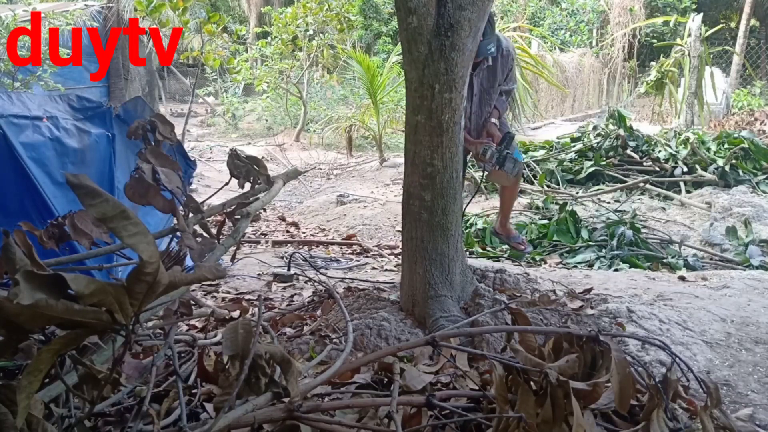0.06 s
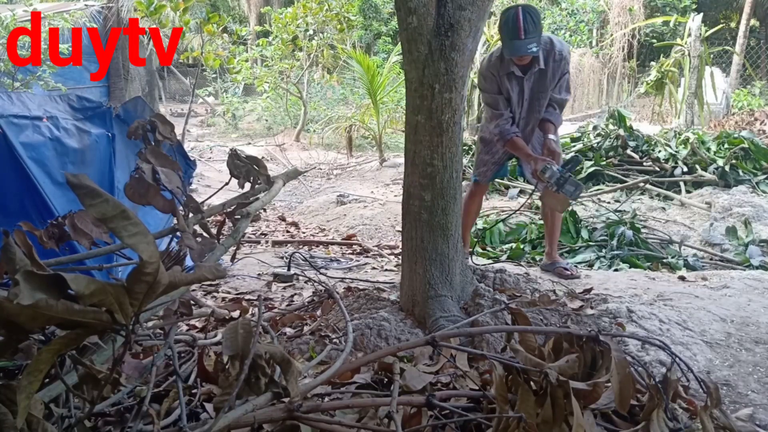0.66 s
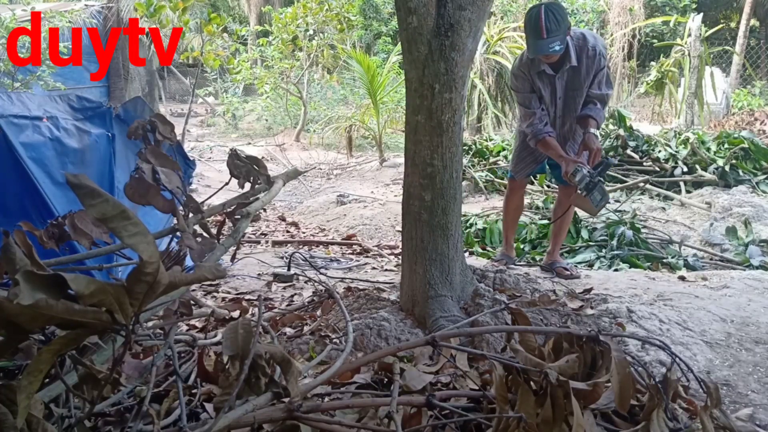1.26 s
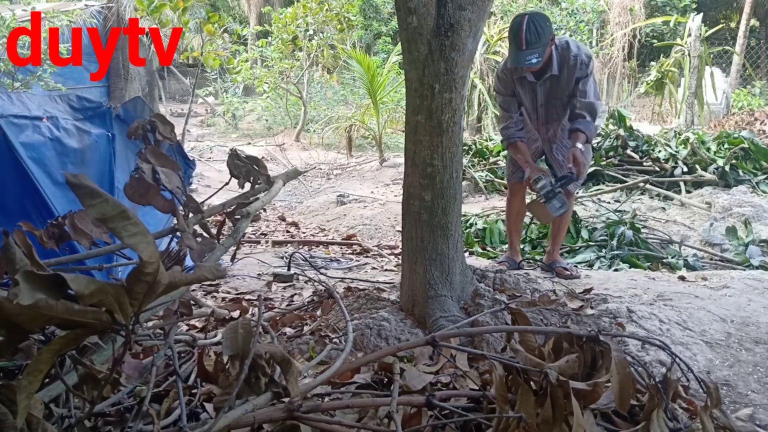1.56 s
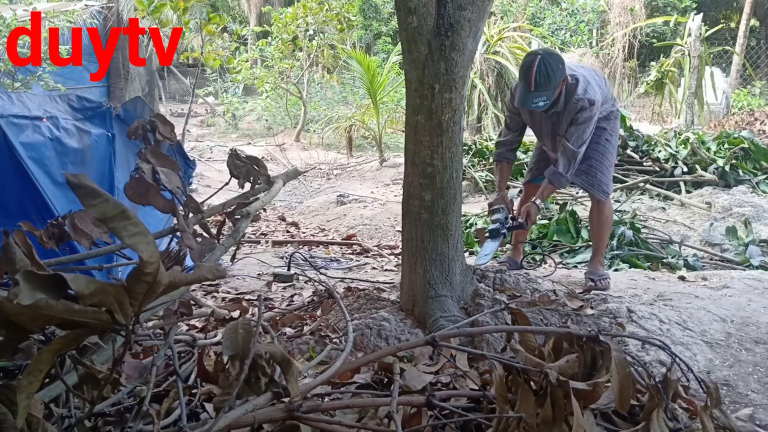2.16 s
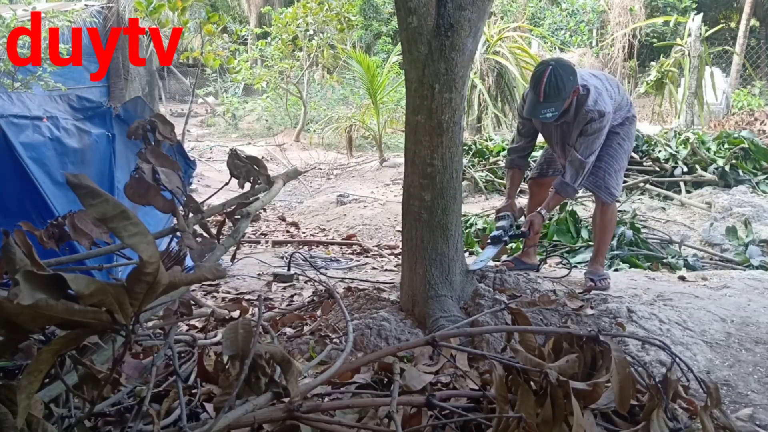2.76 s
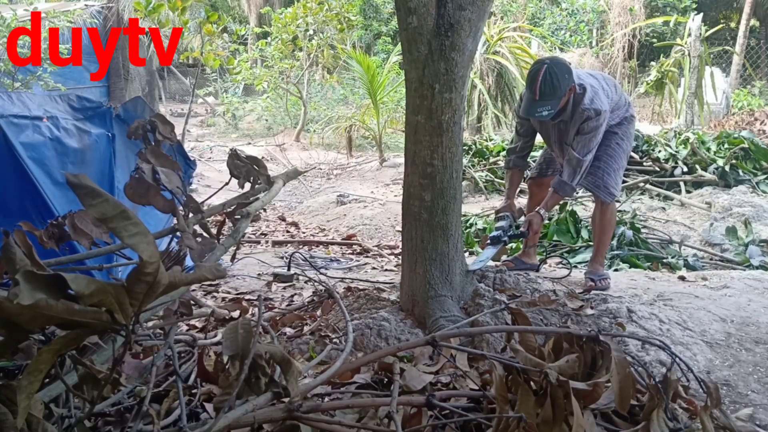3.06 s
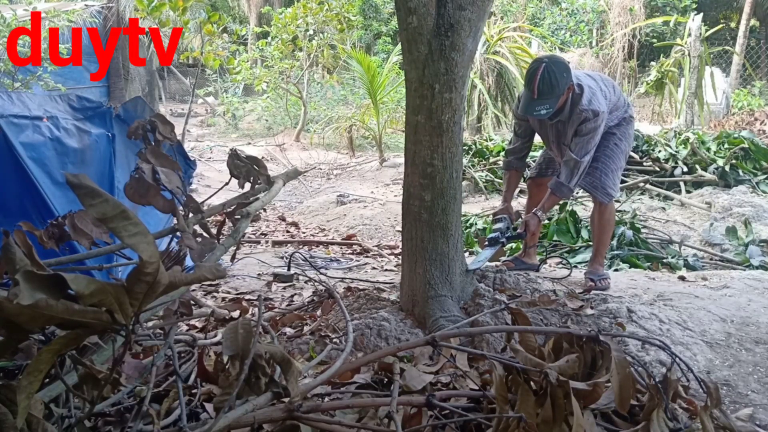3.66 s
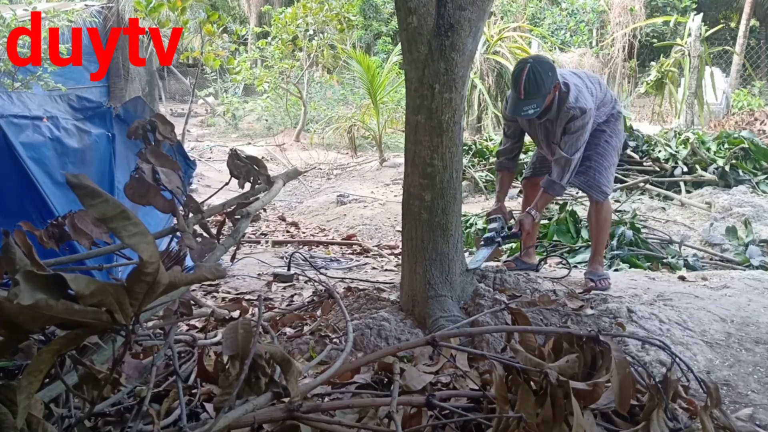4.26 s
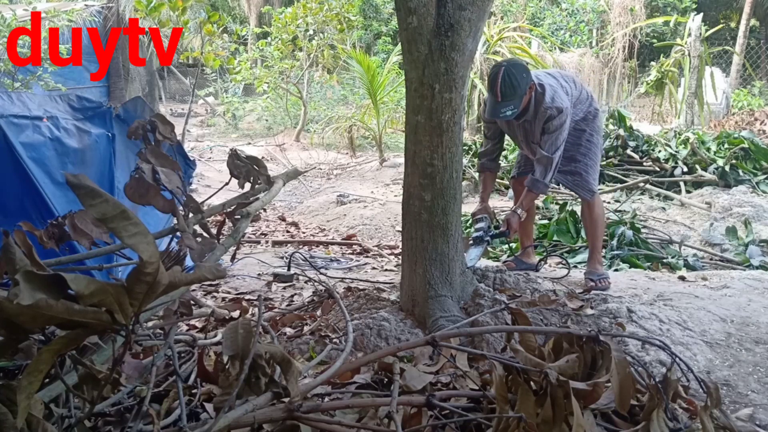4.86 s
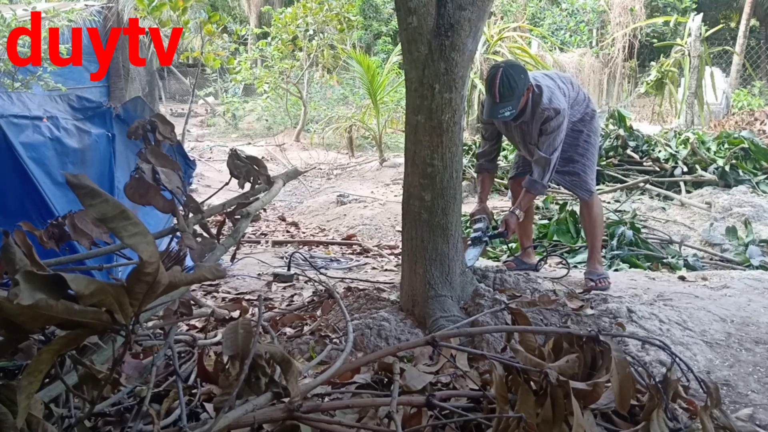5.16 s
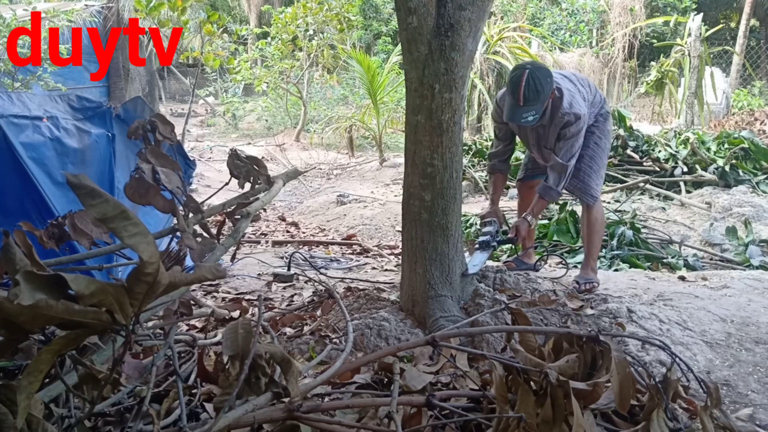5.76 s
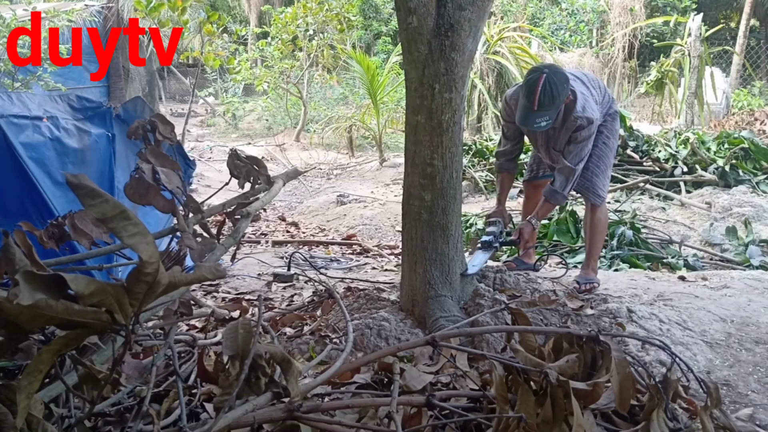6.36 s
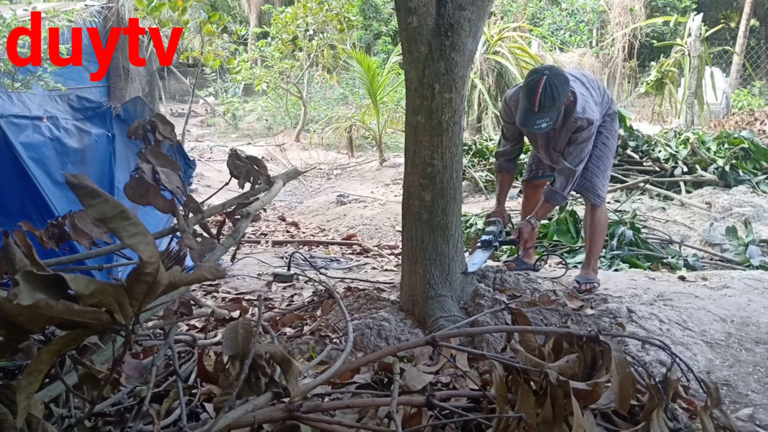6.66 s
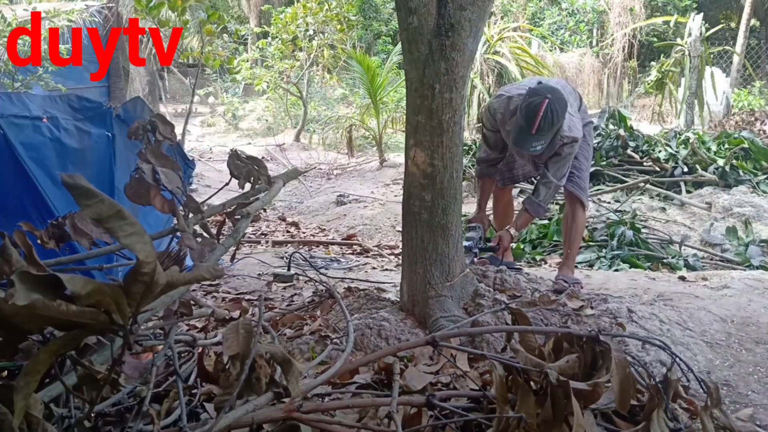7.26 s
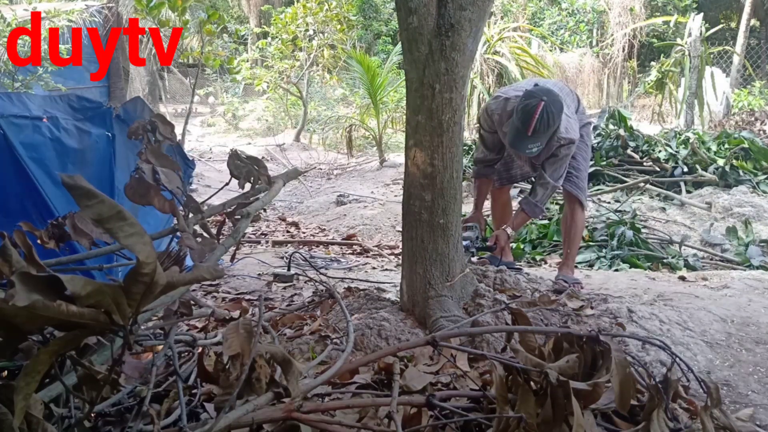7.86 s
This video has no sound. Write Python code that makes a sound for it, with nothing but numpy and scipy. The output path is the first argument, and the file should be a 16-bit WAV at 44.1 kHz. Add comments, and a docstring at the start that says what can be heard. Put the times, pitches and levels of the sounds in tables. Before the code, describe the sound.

A light chain clink breaks a quiet outdoor background, then an electric grinder with a chain bar snaps on and rises to a high, hissing whine. The rattling chain starts tearing into a tree trunk, and the motor's pitch drops under the load. After a coarse growl in the deepest part of the cut, the motor picks up again, then suddenly changes to a lower, lighter run.

```python
"""Outdoors, over faint leaves and far rumble, a loose chain clinks on the bar fitted to an angle grinder.
The electric motor is switched on and whines up, its fan hisses and the chain clatters round the bar.
Lowered into the foot of a tree trunk, the cutters rasp and knock, and the motor sags under the load.
The bar digs in with a growl, then the motor recovers.
Near the end the sound cuts abruptly to a slower, lighter run."""
import sys
import numpy as np
from scipy import signal
from scipy.fft import rfft, irfft, next_fast_len
from scipy.io import wavfile
from scipy.ndimage import map_coordinates

SR = 44100
rng = np.random.default_rng(int(sys.argv[2]) if len(sys.argv) > 2 else 0)


def transcribe(u):
    """Save the signal u as a 16-bit wav file named by the first command-line argument.

    u: samples, shape (n,) or (channels, n), limited to [-1, 1]; the rate is SR.
    q: integer samples, one column per channel.
    """
    v = np.clip(np.atleast_2d(u).T, -1, 1)
    q = np.round(v * 32767).astype(np.int16)
    wavfile.write(sys.argv[1], SR, q)


N = 357651
TIME = np.arange(N) / SR
FFT_SIZE = next_fast_len(N + SR // 2)
BINS_HZ = np.maximum(np.arange(FFT_SIZE // 2 + 1) * SR / FFT_SIZE, 1)
SWITCH_ON_S, JUMP_AT_S = .868, 7.445   # the motor starts; the sound jumps to a slower, lighter run


def running():
    """The motor runs up and the wood slows it. Gives the state: speed, sag, bite, after_jump."""
    # the wood dragging on the chain: time_s, share_of_speed_lost
    drag = [(2.82,0),(3.51,.067),(3.83,.091),(4.47,.166),(4.79,.214),(4.97,.228),(5.11,.224),(5.27,.208),(5.62,.203),(6.23,.225),(6.57,.244),(6.71,.213),(7.03,.139),(7.19,.122),(7.42,.107),(7.95,.147),(8.11,.136)]
    # how hard the cutters bite: time_s, bite (0 free to 1 hardest)
    biting = [(2.3,0.028),(3.3,0.18),(3.7,0.38),(4.5,0.55),(5.15,0.24),(5.6,0.41),(6.35,0.95),(6.9,0.45),(7.4,0.45)]
    top_speed_hz, half_speed_s = 454.5, .109
    age = np.maximum(TIME - SWITCH_ON_S, 1 / SR)
    free_speed = top_speed_hz / (1 + (half_speed_s / age) ** .825)
    sag = in_time(drag)
    after_jump = np.clip((TIME - JUMP_AT_S) / .2 + .5, 0, 1)
    return free_speed * (1 - sag), sag, in_time(biting), after_jump


def chain(turns, state):
    """Links hit sprocket and bar and set the housing and steel ringing; now and then one slaps harder."""
    # ringing notes of the guard and gear housing: pitch_hz, width_hz, level_db
    housing_modes = [(1948,180,-10.5),(2396,270,-3.5),(2602,260,-1),(2855,254,-2),(3440,590,-11.5),(3654,85,-7.5)]
    # the chain swishing round the bar: pitch_hz, level_db
    swish_spectrum = [(1500,-65),(3400,-15),(3900,-5.5),(4400,0),(5300,4),(6000,-5),(7000,-10),(8500,-38)]
    # the bar's bright ring: pitch_hz, level_db
    ring_spectrum = [(2500,-65),(4500,-19),(4720,-4),(4950,2),(5300,-3.5),(5800,-5.5),(6350,-10),(6850,-12.5),(8300,-34)]
    # that ring grows as the tip meets the wood: time_s, level_db
    ring_levels = [(1.4,-39),(2.1,-32.5),(2.85,-26),(3.5,-24),(5.1,-24.5),(6.3,-23.5),(7.4,-26),(7.53,-27)]
    # links grinding on the walls of the cut: pitch_hz, level_db
    grind_spectrum = [(1800,-60),(2900,-12),(3300,4),(4200,4),(4700,-6),(7000,-35)]
    # the free chain clattering while the tool is held high: pitch_hz, level_db
    clatter_spectrum = [(400,-31),(520,-3.5),(620,-1),(740,-2),(860,-23),(1100,1),(1400,8),(1800,-15),(2300,15),(2650,13.5),(3300,-5),(4500,-38)]
    ripple_hz, lowered_s, lowering_s = 100.4, 2.26, .52
    links = contacts(turns * 1.09, uneven_db=4, scrape_s=.00034, sliding_db=9.5)
    slaps = contacts(turns * .27, uneven_db=3.5, scrape_s=.0016, sliding_db=9)
    surge = 1 + .085 * np.sin(2 * np.pi * ripple_hz * TIME)   # the motor pulses at twice the mains rate
    force = surge * links * slaps
    housing = resonate(noise(force), housing_modes)
    housing *= loudness(state, db=-25, speed_db=1, sag_db=5.5, after_jump_db=-1.5)
    swish = loudness(state, db=-27.5, speed_db=3.5, after_jump_db=-3)
    swish *= coloured(noise(force), swish_spectrum)
    ring = from_db(in_time(ring_levels)) * coloured(noise(force), ring_spectrum)
    grind = loudness(state, db=-43.5, sag_db=55, after_jump_db=-1)
    grind *= coloured(noise(force), grind_spectrum)
    held_high = np.clip((lowered_s - TIME) / lowering_s, 0, 1)
    clatter = from_db(-28.5) * held_high * coloured(noise(force), clatter_spectrum)
    return housing + swish + ring + grind + clatter


def whine(turns, state):
    """The motor hums at low multiples of its speed; the gear sings as twelve teeth meet each turn."""
    # the main hum: times_per_turn, level_db
    hum_tones = [(2,0.5)]
    # tones around the octave above it: times_per_turn, level_db
    octave_tones = [(3,-16),(4,0),(6,-8.5),(8,-10)]
    # the gear's tones: times_per_turn, level_db
    gear_tones = [(6.55,-16),(10,-10.5),(12,0),(12.3,-10),(14,-7.5)]
    # the hum swells and fades as the tool is moved: time_s, level_db
    hum_levels = [(1.05,-39),(1.33,-43),(1.55,-39),(1.8,-43),(2.2,-40),(3.3,-42.5),(3.85,-48),(4.3,-45.5),(4.6,-40.5),(5.05,-40),(5.4,-36.5),(5.7,-43),(7.35,-40.5),(7.5,-49),(7.8,-41.5)]
    # so does its octave: time_s, level_db
    octave_levels = [(1.05,-38),(1.22,-42),(1.37,-32),(1.7,-42),(2.1,-36.5),(2.95,-34.5),(3.75,-43),(4,-35),(4.5,-36.5),(5,-45),(5.35,-37.5),(5.75,-42),(7.05,-34),(7.2,-45),(7.85,-38.5)]
    # how well the motor's shell gives off each pitch: pitch_hz, gain_db
    motor_shell = [(300,-19),(560,-5.5),(690,1),(755,0.5),(820,0),(1030,7),(1180,-0.5),(1400,1.5),(1750,-1.5)]
    # the same for the gear's casing: pitch_hz, gain_db
    gear_casing = [(1000,-40),(2050,-18),(2330,9),(2850,9),(3100,1),(3410,4.5),(3620,2),(3750,-7.5),(4100,-5),(4450,-3),(4750,-1.5),(4960,3),(5600,-4)]
    hum = from_db(in_time(hum_levels)) * tones(turns, hum_tones, flutter_db=1.6, flutter_hz=70)
    octave = from_db(in_time(octave_levels)) * tones(turns, octave_tones, flutter_db=2.2, flutter_hz=70)
    gear = tones(turns, gear_tones, flutter_db=1.6, flutter_hz=150)
    gear *= loudness(state, db=-31.8, speed_db=-3.5, after_jump_db=1.2)
    brief_gap = 1 - np.exp(-((TIME - JUMP_AT_S) / .02) ** 2)
    return brief_gap * (shaped(hum + octave, motor_shell) + shaped(gear, gear_casing))


def cutters(turns, state):
    """Each cutter tears off a chip with a rasp; heavier bites knock and thud in the trunk."""
    # wood tearing: pitch_hz, level_db
    rasp_spectrum = [(250,-31),(600,-17),(780,-4.5),(920,-4),(1040,-1),(1220,-2.5),(1420,1.5),(1630,4),(1800,0.5),(2100,0.5),(3700,-6),(9000,-48)]
    # the trunk's knock: pitch_hz, level_db
    knock_spectrum = [(130,-47),(270,-3),(360,0),(440,1.5),(560,3),(750,9.5),(1020,20),(1300,-3),(2000,-27)]
    # its deep thud: pitch_hz, level_db
    thud_spectrum = [(40,-23),(90,-6),(150,-7.5),(235,-1),(330,-19),(1000,-48)]
    # the trunk droning as it grips the shaking bar: times_per_turn, level_db
    trunk_tones = [(.7,-5.5),(1,-2.5)]
    tearing = noise(contacts(turns * .36, uneven_db=.5, scrape_s=.001, sliding_db=4.5))
    gripped = np.clip(state[1] / .11, 0, 1)   # full grip once the speed sags by 11 %
    drone = gripped * tones(turns, trunk_tones, flutter_db=4.5, flutter_hz=45)
    drone *= loudness(state, db=-52.5, bite_db=-2, after_jump_db=-7)
    rasp = coloured(tearing, rasp_spectrum)
    rasp *= loudness(state, db=-29.5, speed_db=.5, sag_db=-24, bite_db=4, after_jump_db=-5.5)
    knock = loudness(state, db=-50.5, bite_db=12.5, after_jump_db=5) * coloured(tearing, knock_spectrum)
    thud = loudness(state, db=-65, bite_db=13.5, after_jump_db=-1) * coloured(tearing, thud_spectrum)
    return rasp + knock + thud + drone


def growl(turns):
    """While the bar digs in deep, the chain judders through the wood in coarse jolts."""
    # the juddering chain: pitch_hz, level_db
    growl_spectrum = [(420,-31),(520,-3),(620,-23),(760,4.5),(900,1),(1120,2),(1280,-5),(1550,5),(2000,-25)]
    start_s, end_s, fade_s = 5.68, 6.72, .12
    digging = np.clip(np.minimum(TIME - start_s, end_s - TIME) / fade_s, 0, 1)
    jolts = contacts(turns * .18, uneven_db=2, scrape_s=.004, sliding_db=-3)
    return from_db(-36) * digging * coloured(noise(jolts), growl_spectrum)


def fan(turns, state):
    """The cooling fan hisses, with a fine spatter of chips in it; a roar follows speed and cut."""
    # rushing air: pitch_hz, level_db
    hiss_spectrum = [(400,-40),(2000,0),(6500,0.5),(8000,-1),(9700,-3.5),(10400,-2),(11500,0),(12500,-3),(13600,3.3),(15500,0)]
    spatter = contacts(turns * .7, uneven_db=3.5, scrape_s=.0006, sliding_db=3.5)
    hiss = coloured(noise(spatter), hiss_spectrum)
    hiss *= loudness(state, db=-27.6, speed_db=8, bite_db=3.5, after_jump_db=-4.5)
    roar = drift(130) * np.sin(2 * np.pi * 2.35 * turns)
    roar *= loudness(state, db=-45.5, sag_db=-17, bite_db=10)
    return hiss + shaped(roar, [(300, -30), (550, -4.5)])   # a small fan gives off little bass


def loose_chain():
    """The loose chain clinks on the bar; at switch-on the chain snatches up its slack in two quick jerks."""
    # the chain touches the bar: peak_s, level_db
    touch_times = [(.69,0),(.717,-2)]
    # the bar's ringing notes: pitch_hz, width_hz, level_db
    bar_modes = [(2630,130,-15),(3700,600,-14),(4690,100,-13),(4950,100,0),(5180,140,-8),(5700,700,-16)]
    # steel gives off little treble above those notes: pitch_hz, gain_db
    steel_treble = [(6200,0),(7500,-5),(10000,-20)]
    # the slack pulls tight: peak_s, level_db
    jerk_times = [(.868,0),(.897,-1)]
    touches = sum(from_db(db) * burst(s, rise_s=.015, fade_s=.26) for s, db in touch_times)
    clink = coloured(resonate(touches, bar_modes), steel_treble)
    jerks = sum(from_db(db) * burst(s, rise_s=.00038, fade_s=.06) for s, db in jerk_times)
    snatch = resonate(jerks, [(900, 1100, -9), (2570, 180, 9.5), (5200, 640, -6)])
    return from_db(-67.5) * clink + from_db(-50.5) * coloured(snatch, [(200, -25), (650, 0)])


def outdoors(x):
    """The direct sound reaches the left side first; ground, trunks and leaves add short echoes."""
    # how far the left side's wave is ahead: pitch_hz, lead_radians
    left_lead = [(50,0.5),(700,0.01),(1640,0.49),(2600,1.15),(4400,1.25),(4850,2.5),(5430,3.5),(6700,3),(9000,1.5),(12500,3),(14000,3.5)]
    # how much louder the left is than the right: pitch_hz, gain_db
    balance = [(100,-1.5),(1200,-0.9),(2700,0.5),(4800,-5.5),(5800,2.5),(9000,-1),(14000,-0.5)]
    # the echoes against the direct sound: pitch_hz, level_db
    scatter = [(100,-13),(700,-8.5),(1500,-5.5),(2900,-3),(3900,2.5),(5200,-3.5),(7200,2),(8700,-5),(14000,7)]
    echoes = np.zeros((2, N))
    shiftable = signal.hilbert(x, FFT_SIZE)[:N]   # a form of x whose pitch is easy to shift
    lags_s = np.geomspace(.003, .03, num=20)
    for k, lag in enumerate((lags_s * SR).astype(int)):
        shift_hz = 11 * rng.uniform(-1, 1)   # the moving tool shifts each echo a little
        shifted = np.real(shiftable * np.exp(2j * np.pi * (shift_hz * TIME + rng.random())))
        echoes[k % 2, lag:] += from_db(-60 * lag / SR / .35) * shifted[:-lag]
    echo_share = from_db(per_bin(scatter))
    sides = np.array([[1], [-1]])
    gain = from_db(sides * per_bin(balance) / 2) / np.sqrt(1 + echo_share ** 2)
    direct = filtered(x, gain * np.exp(.5j * sides * per_bin(left_lead)))
    return direct + filtered(rms_one(echoes) * np.std(x), gain * echo_share)


def move_to_trunk(stereo):
    """The tool starts further to one side, so its sound reaches the right later until it is at the trunk."""
    # extra delay on the right: time_s, delay_s
    right_delay = [(1.15,.00008),(1.7,.00004),(2.3,.00002),(3.2,0)]
    left, right = stereo
    return np.array([left, map_coordinates(right, [(TIME - in_time(right_delay)) * SR], order=5)])


def surroundings():
    """A faint, gently stirring wash of leaves and far rumble."""
    # rumble and leaves: pitch_hz, level_db
    wash_spectrum = [(25,-18),(50,-16.5),(100,-5),(170,-5.5),(260,-13),(445,-10),(1300,-24.5),(2400,-22),(4100,-34.5),(5200,-30),(7700,-47),(15500,-52)]
    middle, left, right = (coloured(noise(), wash_spectrum) for _ in range(3))
    apart = shaped(np.array([left, right]), [(300, -6), (3000, 10)])   # the bass is alike on both sides
    return from_db(-57 + 1.1 * drift(6.8)) * (middle + apart)


def loudness(state, db, speed_db=0, sag_db=0, bite_db=0, after_jump_db=0):
    """Gain: db at cruising speed, plus dB per doubling of speed and per unit of sag, bite, after_jump."""
    speed, sag, bite, after_jump = state
    cruise_hz = 360
    doublings = np.maximum(np.log2(speed / cruise_hz), -2)
    return from_db(db + speed_db * doublings + sag_db * sag + bite_db * bite + after_jump_db * after_jump)


def contacts(passes, uneven_db, scrape_s, sliding_db):
    """A force: one knock of random strength per pass, each trailing a short scrape, over steady sliding."""
    uneven_passes = np.maximum.accumulate(passes + .25 * drift(300))
    hits = np.flatnonzero(np.diff(np.floor(uneven_passes)) > 0)
    knocks = np.zeros(N)
    knocks[hits] = from_db(uneven_db * rng.uniform(-2, 2, len(hits)))
    scrapes = signal.lfilter([1], [1, -np.exp(-1 / (scrape_s * SR))], knocks + 1e-18)
    return np.sqrt(rms_one(scrapes) ** 2 + from_db(sliding_db) ** 2)


def tones(turns, rows, flutter_db, flutter_hz):
    """Tones that follow the motor's turning, each fluttering in level on its own."""
    return sum(from_db(db + flutter_db * drift(flutter_hz))
               * np.sin(2 * np.pi * (per_turn * turns + rng.random())) for per_turn, db in rows)


def resonate(x, modes):
    """Let x ring a body's notes (pitch_hz, width_hz, level_db), added with alternating sign; power 1."""
    ringing = 0
    for k, (hz, width, db) in enumerate(modes):
        r = np.exp(-np.pi * width / SR)
        poles = [1, -2 * r * np.cos(2 * np.pi * hz / SR), r * r]
        ringing += (-1) ** k * from_db(db) * (1 - r * r) / 2 * signal.lfilter([1, 0, -1], poles, x)
    return rms_one(ringing)


def burst(peak_s, rise_s, fade_s):
    """Noise that swells to a peak, then falls 60 dB in fade_s."""
    age = TIME - peak_s
    return noise(np.exp(np.minimum(age, 0) / rise_s) * from_db(-60 * np.maximum(age, 0) / fade_s))


def noise(strength=1):
    """White noise that follows a strength."""
    return strength * rng.standard_normal(N)


def drift(rate_hz):
    """A random wobble of size 1 that changes about rate_hz times a second."""
    return rms_one(filtered(rng.standard_normal(FFT_SIZE), 1 / (1 + (BINS_HZ / rate_hz) ** 2)))


def coloured(x, spectrum):
    """Shape x with a spectrum, then scale it to power 1."""
    return rms_one(shaped(x, spectrum))


def shaped(x, spectrum):
    """Turn the pitches of x up or down by a table of pitch_hz, gain_db."""
    return filtered(x, from_db(per_bin(spectrum)))


def filtered(x, response):
    """Multiply each frequency in x by its own gain."""
    return irfft(rfft(x, FFT_SIZE) * response, FFT_SIZE)[..., :N]


def per_bin(rows):
    """Join rows of pitch_hz, value with lines on a log scale of pitch."""
    hz, value = np.transpose(rows)
    return np.interp(np.log(BINS_HZ), np.log(hz), value)


def in_time(rows):
    """Join rows of time_s, value with lines, one value per sample."""
    return np.interp(TIME, *np.transpose(rows))


def rms_one(x):
    """Scale to an average power of 1."""
    return x / np.sqrt(np.mean(x ** 2) + 1e-20)


def from_db(db):
    """Decibels to gain."""
    return 10 ** (np.asarray(db) / 20)


def scene():
    """One motor drives every part of the tool, heard among the trees."""
    state = running()
    speed_hz = state[0] * (1 - .244 * (TIME > JUMP_AT_S))   # the pitch steps down at the jump
    tremble = 1 + .001 * drift(25)   # single bites shake the speed
    turns = np.cumsum(speed_hz * tremble) / SR
    tool = (whine(turns, state) + chain(turns, state) + cutters(turns, state)
            + growl(turns) + fan(turns, state))
    get_going = 1 - np.exp(-np.maximum(TIME - SWITCH_ON_S, 0) / .032)
    return move_to_trunk(outdoors(tool * get_going + loose_chain())) + surroundings()


def record(dry):
    """Cut the treble steeply above 15450 Hz."""
    return signal.sosfilt(signal.ellip(12, .1, 85, 15450, fs=SR, output="sos"), dry)


dry = scene()
out = record(dry)
transcribe(out)
```